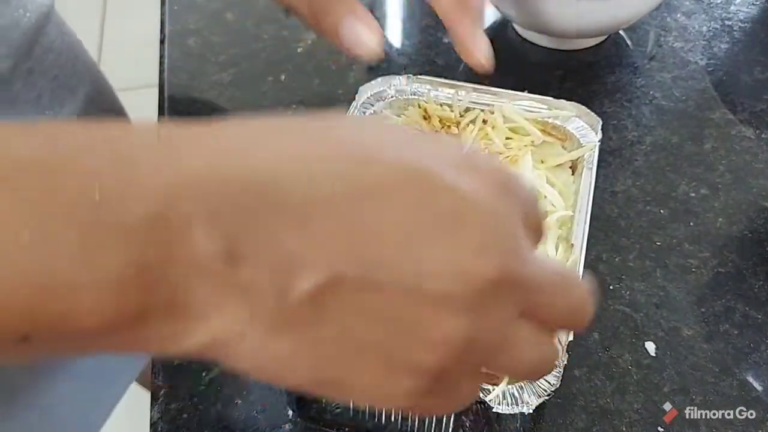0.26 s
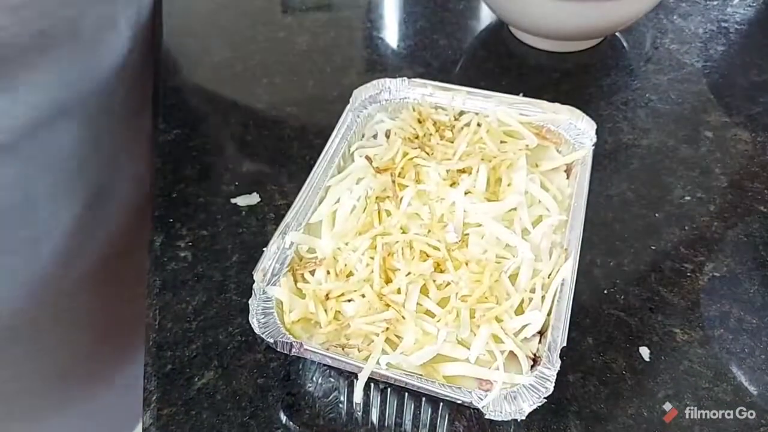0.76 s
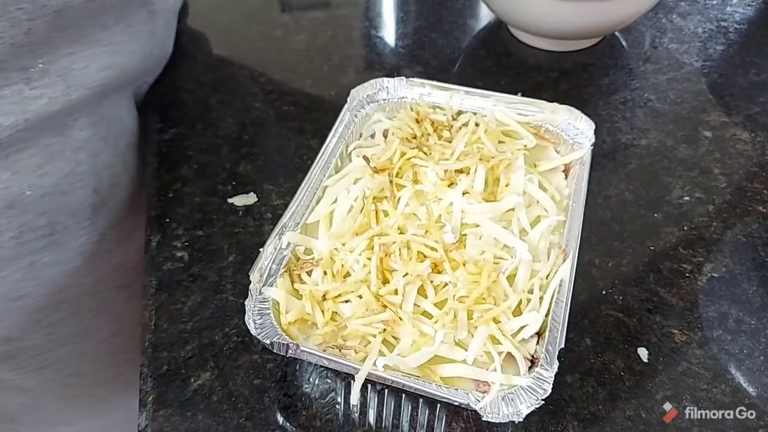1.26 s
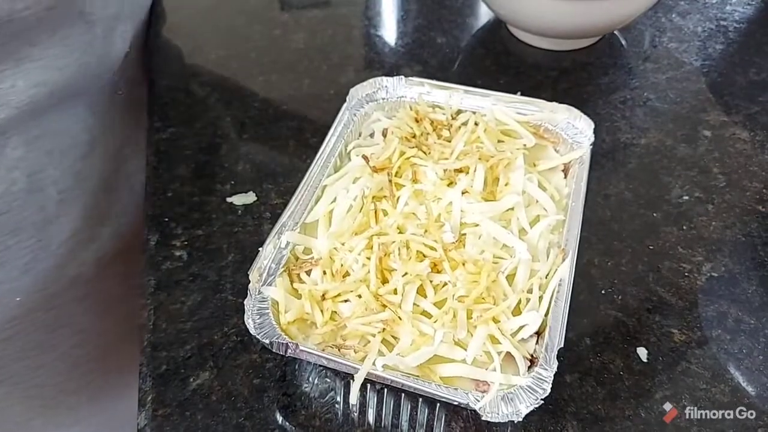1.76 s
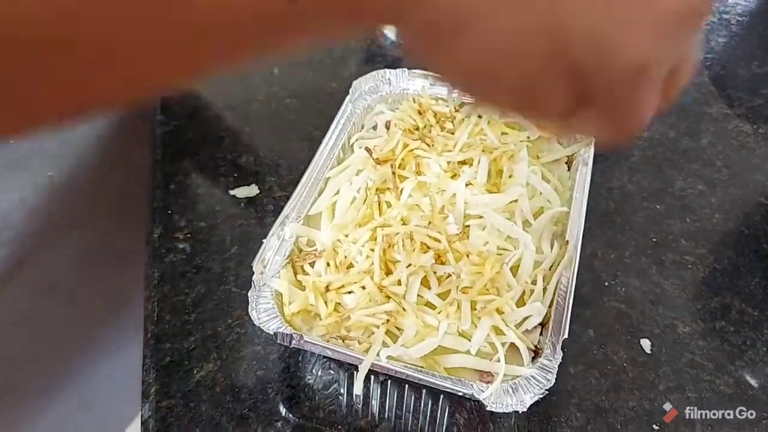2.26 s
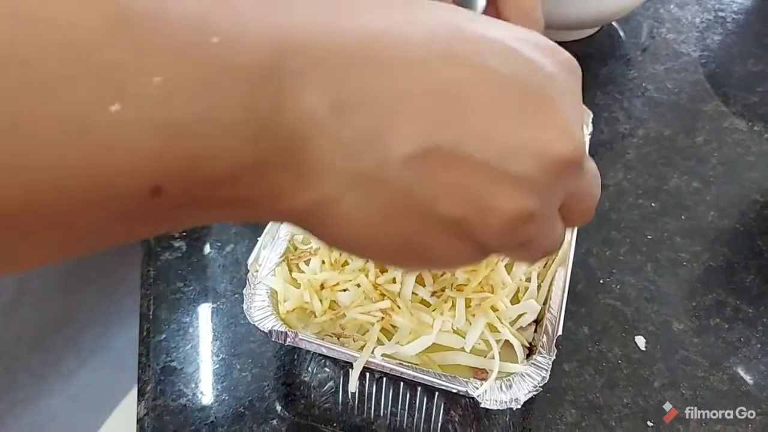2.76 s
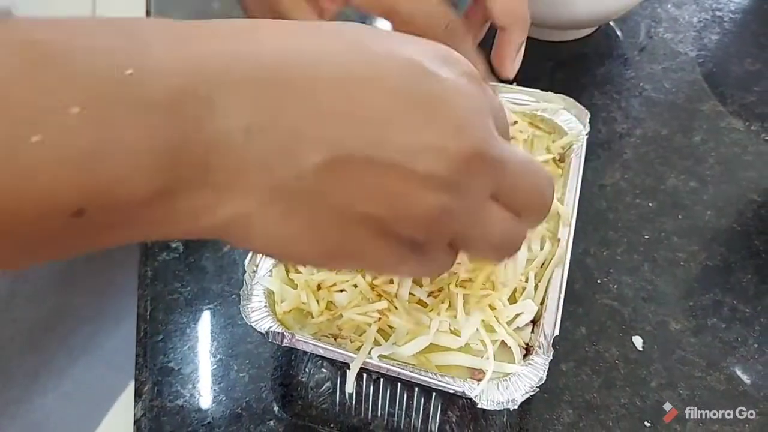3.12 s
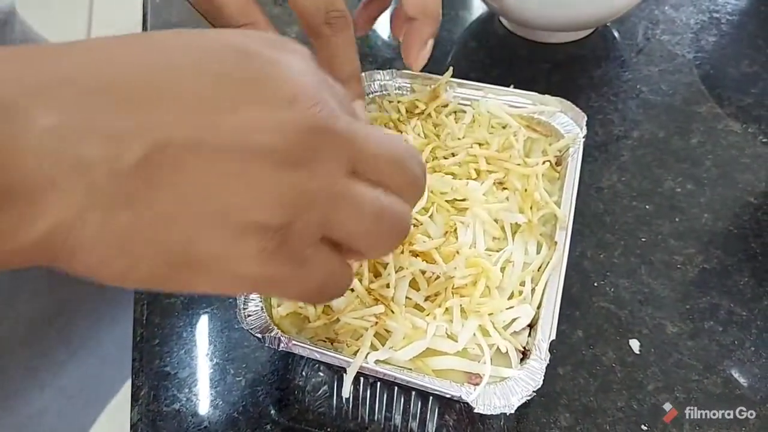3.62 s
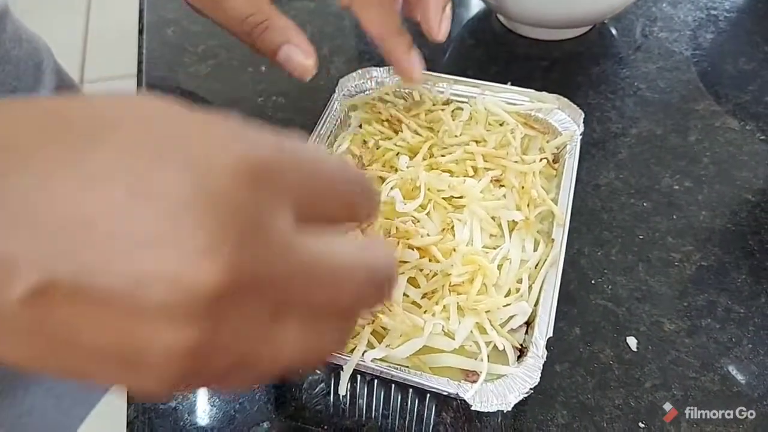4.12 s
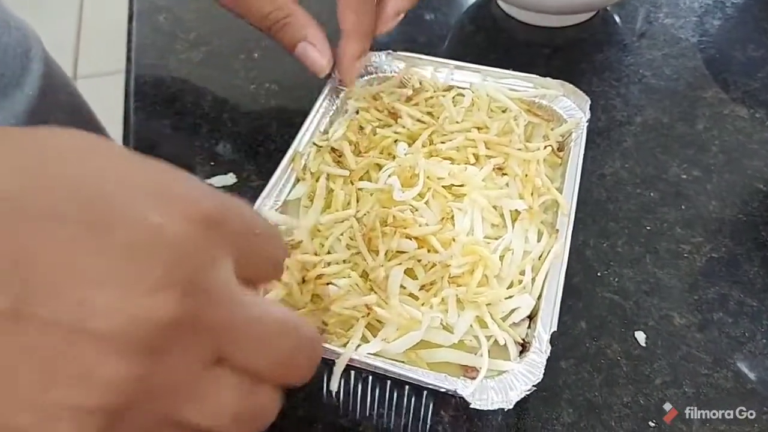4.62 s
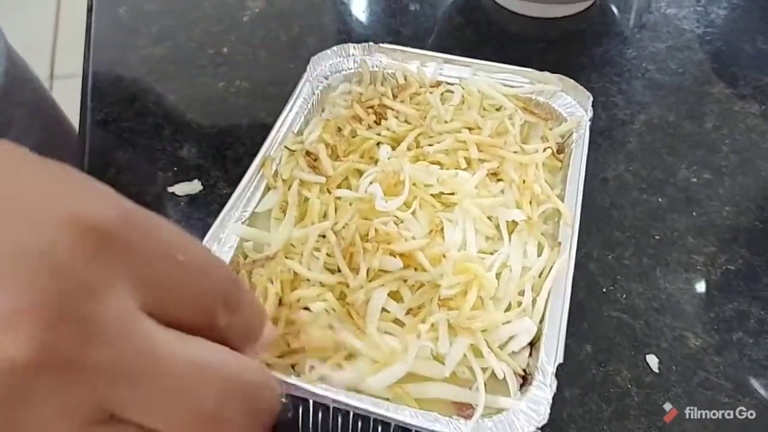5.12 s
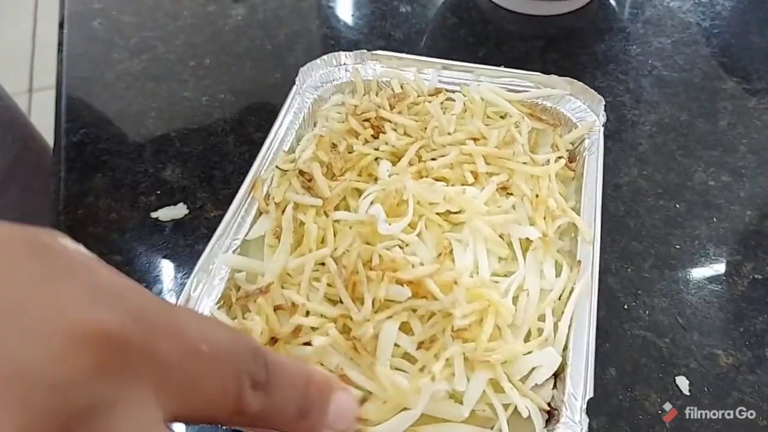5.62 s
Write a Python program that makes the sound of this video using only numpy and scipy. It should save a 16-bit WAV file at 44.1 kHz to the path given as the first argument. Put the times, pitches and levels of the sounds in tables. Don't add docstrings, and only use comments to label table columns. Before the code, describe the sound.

In a reverberant kitchen, fingers drop and press crunchy sticks onto a foil tray: a few snaps first, then a startling sheet-metal clang, a calm stretch, and several clusters of sharp ticks, crushes and light foil taps. Steady motor hum, broadband air and bassy street rumble lie underneath, dipping slightly after the clang. A far bird chirps hoarsely. Close stereo pickup.

```python
import sys
import numpy as np
from scipy import signal
from scipy.fft import rfft, irfft
from scipy.io import wavfile
from scipy.ndimage import uniform_filter1d

SR = 44100
rng = np.random.default_rng(int(sys.argv[2]) if len(sys.argv) > 2 else 0)


def int16_out(signal):
    q = np.round(np.clip(np.atleast_2d(signal).T, -1, 1) * 32767)
    wavfile.write(sys.argv[1], SR, q.astype(np.int16))


def natural_amplitude(level_db):
    exponent = np.asarray(level_db, float) / 20
    return 10 ** exponent


N = 259249
LID_S = 1.0955

# frequency in Hz, left-right likeness from 0 to 1.
COHERENCE = [(30, 0.73), (70, 0.11), (130, 1), (300, 0.92), (500, 0.68), (800, 0.26), (1400, 0),
             (3000, 0.019), (15000, 0)]


def evened(x):
    return x / np.sqrt(np.mean(x ** 2) + 1e-20)


def read(points, hz):
    f, value = np.transpose(points)
    return np.interp(np.log(hz + 1), np.log(f + 1), value)


def add(mix, s, sound):
    part = mix[..., round(s * SR):][..., :sound.shape[-1]]
    part += sound[..., :part.shape[-1]]


def resonate(x, hz, width):
    turn = np.exp(2j * np.pi * np.cumsum(hz * np.ones(x.shape[-1])) / SR)
    r = np.exp(-np.pi * width / SR)
    return 2 * (turn * signal.lfilter([1 - r], [1, -r], x / turn + 1e-18)).real


def steep(x, hz, width):
    return evened(resonate(resonate(x, hz, width), hz, width))


def colour(points):
    hz = abs(np.fft.fftfreq(4096, 1 / SR))
    log_gain = np.log(natural_amplitude(np.maximum(read(points, hz), -90)))
    return np.fft.ifft(np.exp(np.conj(signal.hilbert(log_gain)))).real[:2048]


def scattered(x):
    z = rfft(x)
    return irfft(z / (abs(z) + 1e-12), x.shape[-1])


def lumpy(x):
    return x / np.linalg.norm(x, axis=-1, keepdims=True)


def wander(hz):
    return evened(resonate(rng.standard_normal(N), 0, hz))


def diffuse(field_db, count):
    frames = count // 256 + 5
    hz = np.fft.rfftfreq(1024, 1 / SR)[:, None]
    a, b, c, d = rng.standard_normal((frames, 513, 4)).T
    same = np.clip(read(COHERENCE, hz), -1, 1)
    left = a + 1j * b
    right = same * left + np.sqrt(1 - same ** 2) * (c + 1j * d)
    z = np.array([left, right]) * natural_amplitude(field_db(hz, np.arange(frames) * 256 / SR))
    return signal.istft(z, nperseg=1024, noverlap=768)[1][:, :count]


def air():
    # frequency in Hz, density in dB per Hz.
    air_spectrum = [(20, -27), (35, -1), (60, -0.5), (85, -5), (130, -9.5), (300, -10), (600, -12.5),
                    (1200, -14.5), (2600, -17), (5500, -24.5), (7000, -31), (8000, -31), (12000, -39),
                    (16000, -51)]
    patches = rng.standard_normal((N // 256 + 5, 513)).T
    patches = evened(uniform_filter1d(uniform_filter1d(patches, size=14, axis=0), size=15, axis=1))
    s = np.arange(N) / SR
    lull_s, lull_width_s, lull_db = 1.96, 0.6, -4
    traffic_db = 1.5 * wander(0.79) + 0.4 * s
    traffic_db = traffic_db + lull_db * np.exp(-((s - lull_s) / lull_width_s) ** 2)
    traffic_db = traffic_db - traffic_db.mean()

    def field_db(hz, t):
        swell = np.interp(t, s, traffic_db) / (1 + (hz / 110) ** 4)
        return read(air_spectrum, hz) + 1.8 * patches + swell

    return natural_amplitude(-52.5) * evened(diffuse(field_db, N))


def hum():
    # frequency in Hz, level in dB.
    hum_lines = [(119.5, -63.5), (175.5, -49), (239.7, -56.5), (312, -73.5), (480, -64.5), (599, -69),
                 (657, -70), (720, -70.5), (2073, -73), (2164, -74.5), (2729, -72), (2810, -69)]
    # time in seconds, level in dB, frequency in Hz.
    pipe_glide = [
        (4.3, -60, 520),
        (4.36, -56.5, 463),
        (4.42, -53, 445.6),
        (4.5, -61, 469),
        (4.56, -59, 445),
        (4.619, -93, 440),
    ]
    t, out = np.arange(N) / SR, np.zeros((2, N))
    for hz, db in hum_lines:
        swim = np.clip(0.06 * natural_amplitude((-47 - db) * 0.7), 0, 1)
        apart = np.arccos(np.clip(read(COHERENCE, hz), -1, 1)) * np.array([[0], [1]])
        phase = 2 * np.pi * (hz * t + rng.random()) + 1.4 * swim * wander(1.8)
        out += np.sqrt(2) * natural_amplitude(db + 6.3 * swim * wander(1.3)) * np.sin(phase + apart)
    s, db, hz = np.transpose(pipe_glide)
    moan_db = np.interp(t, s, db, -120, -120) + 4.8 * wander(21.0)
    moan = np.sin(2 * np.pi * np.cumsum(np.interp(t, s, hz)) / SR) * natural_amplitude(moan_db)
    return out + moan


def bird():
    # start within the phrase in seconds, length in seconds, start pitch in Hz,
    # end pitch in Hz, level in dB.
    phrase = [
        (0, 0.066, 4760, 4740, -2.5),
        (0.023, 0.067, 5640, 5680, 1),
        (0.054, 0.057, 5520, 5280, -9),
        (0.078, 0.06, 3710, 3765, 2),
        (0.099, .055, 4340, 4250, 0),
        (.115, 0.065, 4680, 4700, -3),
        (.212, .036, 4000, 3670, -18),
    ]
    # start in seconds, level in dB, pitch factor.
    calls = [
        (2.257, -58, .995),
        (4.198, -56, 1.005),
    ]
    # start in seconds, length in seconds, start pitch in Hz, end pitch in Hz, level in dB.
    strays = [
        (0.576, 0.058, 5840, 5440, -69),
        (4.365, 0.11, 5870, 5900, -66),
        (5.562, 0.029, 5450, 5220, -63),
    ]
    out, shake = np.zeros(N), wander(124.0)
    sung = [(at + s, length, a * pitch, b * pitch, call_db + db)
            for at, call_db, pitch in calls for s, length, a, b, db in phrase]
    for s, length, start_hz, end_hz, db in sung + strays:
        t = np.arange(0, length, 1 / SR)
        hz = np.interp(t, [0, length], [start_hz, end_hz]) + 190 * shake[round(s * SR):][:len(t)]
        note = np.sin(2 * np.pi * np.cumsum(hz) / SR) * signal.windows.tukey(len(t), .6)
        add(out, s, natural_amplitude(db + 10.5) * note)
    return out


def room(x):
    # frequency in Hz, 60 dB decay in seconds.
    decay_times = [(120, 0.47), (330, 0.67), (870, 1), (1600, 0.72), (2300, 0.86), (6060, 0.74),
                   (12000, 0.54)]
    t = np.arange(SR) / SR
    z = rfft(diffuse(lambda hz, t: -60 * t / read(decay_times, hz), SR))
    power = uniform_filter1d(abs(z.mean(0)) ** 2 + .3 * abs(z[0]) ** 2, size=40)
    tail = irfft(z / np.sqrt(power), SR)
    tail = tail * np.clip(t / 0.00048, 0, 1) * (t < .9)
    return signal.fftconvolve(x[None], tail / np.linalg.norm(tail[0]), axes=1)[:, :N]


def lid():
    # frequency in Hz, level in dB, 60 dB decay in seconds.
    modes = [(232, -15.5, 0.62), (381.3, -3.5, 0.36), (427.7, -2.5, 0.31), (492, 3, 0.6),
             (721.5, -4.5, 0.47), (758, -12, 0.58), (810, -6.5, 0.31), (1002, -4, 0.23), (1210, -28, 0.32),
             (1236, -12.5, 0.51), (1603, -3, 0.16), (1636, 4, 0.082), (2065, -16, 0.29), (2364, -9, 0.48),
             (2397, 1, 0.37), (2433, -13, 0.39), (2487, -5.5, 0.45), (2573, -21, 0.35), (2980, -14, 0.2),
             (4030, -11.5, 0.47), (4250, -23, 0.13), (4900, -35, 0.15), (5500, -33, .3), (5460, -38, 0.25),
             (5860, -21.5, 0.61), (6300, -31, 0.27)]
    # frequency in Hz, density in dB per Hz.
    blow_spectrum = [(40, -20), (90, -17.5), (230, -21), (430, 0.5), (620, -9), (850, -5.5), (1300, -14),
                     (1650, -9), (2400, -9), (3200, -18.5), (5500, -19), (8000, -23), (12000, -34),
                     (16000, -47)]
    t = np.arange(SR) / SR
    ring = sum(natural_amplitude(db - 60 * t / t60) * np.sin(2 * np.pi * hz * t) for hz, db, t60 in modes)
    ring = ring * (1 - np.exp(-t / 0.002))
    blow = t[:600] * natural_amplitude(-60 * t[:600] / 0.0117)
    burst = scattered(rng.standard_normal(600) * blow) * np.sqrt(blow / blow.max())
    crack = np.convolve(burst, colour(blow_spectrum))
    out = np.zeros((2, N))
    add(out[0], LID_S, natural_amplitude(-8.5) * ring / abs(ring).max())
    add(out[1], LID_S, natural_amplitude(-6) * crack / abs(crack).max())
    return out


def rustle():
    # full strength from in seconds, hold in seconds, level in dB.
    stirs = [
        (0.0, .02, -69),
        (2.3, 0.22, -67.5),
        (3.375, 0.062, -60),
        (4.133, 0.22, -64),
        (4.6, .1, -76),
        (5.66, .25, -66.5),
    ]
    # frequency in Hz, density in dB per Hz.
    grain_spectrum = [(1500, -17), (3000, 5.5), (5000, 2), (8000, -2), (12000, -8), (16000, -14)]
    t = np.arange(N) / SR
    rise, fall = 69, 55
    level = sum(natural_amplitude(db - rise * np.maximum(s - t, 0) - fall * np.maximum(t - s - hold, 0))
                for s, hold, db in stirs)
    before = LID_S - t
    scrape = natural_amplitude(-53.5 - 52 * before)
    level = level + scrape * np.clip((0.16 - before) / 0.066, 0, 1) * (before > .006)
    grains = natural_amplitude(0.65 * np.minimum(rng.exponential(1, (N, 2)).T, 5)) * rng.standard_normal((N, 2)).T
    fizz = signal.oaconvolve(grains, colour(grain_spectrum)[None], axes=1)[:, :N]
    return natural_amplitude(2.0) * level * evened(fizz)


def brittle(shake, db, hz, foil_db, sizzle_db, top_hz):
    foil = steep(shake, 2260, 490) + 0.55 * steep(shake, 1686, 530) + 1.12 * steep(shake, 2800, 2200)
    rings = 0.77 * steep(shake, hz, 0.18 * hz) + 1.17 * steep(shake, hz * 0.96, 3180)
    sizzle = natural_amplitude(sizzle_db - 3.0) * steep(shake, 6000, 10600)
    sound = evened(rings) + natural_amplitude(foil_db) * evened(foil) + sizzle
    band = signal.butter(2, [900, min(top_hz, .45 * SR)], "band", fs=SR)
    sound = signal.lfilter(*band, sound)
    return natural_amplitude(db) * sound / abs(sound).max()


def break_shake():
    t = np.arange(3000) / SR
    noise = rng.standard_normal((2, 3000))
    blow = (1 - np.exp(-t / .0006)) * natural_amplitude(-60 * t / .009)
    burst = scattered((noise[0] + noise) * blow) + 0.89 * lumpy(noise * blow)
    return evened(burst * np.sqrt(blow)) + 1.7 * noise * natural_amplitude(-60 * t / 0.047)


def crush_shake(length):
    t = np.arange(3000) / SR
    noise, size = rng.standard_normal((2, 2, 3000))
    swarm = natural_amplitude(4.34 * evened(uniform_filter1d(size[0], size=30)))
    press = np.clip(t / (0.17 * length), 0, 1) * natural_amplitude(-60 * np.maximum(t - length, 0) / 0.049)
    return noise * swarm * press


def sticks():
    # start in seconds, peak in dB, ring in Hz, left-right balance in dB.
    snaps = [(0.1224, -45.5, 4570, -10), (0.1708, -35.5, 3680, -9), (0.2799, -30.5, 4360, -9),
             (2.6515, -32, 4240, 2), (3.3622, -33.5, 4200, -2), (3.449, -32.5, 5160, -2),
             (3.462, -29, 4900, -2), (3.5042, -30, 4360, -2), (3.5249, -43.5, 3040, 3),
             (3.6754, -27.5, 2800, 4), (3.68, -27, 7330, -5), (3.7017, -37, 3360, 3),
             (4.4632, -42, 7000, 6), (5.329, -48, 3900, -11)]
    # start in seconds, peak in dB, ring in Hz, left-right balance in dB.
    ticks = [(0.0944, -46, 3200, -8), (1.598, -49, 4050, 3), (2.6918, -24.5, 5500, -10.5),
             (2.9338, -45.5, 4900, -8), (3.0162, -44, 5860, -6), (3.356, -38, 6500, -7),
             (3.432, -46, 6000, 5), (3.4784, -41, 6500, 1), (3.558, -50, 7000, -2), (5.1183, -42, 7000, -9),
             (4.146, -42.5, 4530, 10), (4.158, -40, 4630, -1), (4.2222, -40, 7500, -2),
             (4.474, -36, 5000, -4.0), (4.5331, -34.5, 8900, -1.5), (4.7219, -32.5, 5040, -13),
             (5.1514, -40, 7000, 6), (5.1646, -27, 5500, -7.5), (5.6797, -48, 5700, 4),
             (5.7082, -35, 5900, -2.5), (5.7596, -44, 4530, 1.5)]
    # start in seconds, peak in dB, ring in Hz, left-right balance in dB.
    landings = [
        (0.1373, -44.5, 4220, -7),
        (3.667, -28, 4030, -11),
        (3.8532, -39, 5270, -3.5),
        (4.0954, -32.5, 4300, 9.5),
        (4.2474, -37, 4650, 2),
        (4.6989, -35.5, 6150, -21),
        (4.912, -54, 3500, 6),
        (5.7394, -42, 5350, -8),
    ]
    # start in seconds, peak in dB, ring in Hz, left-right balance in dB.
    knocks = [
        (3.2065, -34.5, 3160, -7),
        (3.4074, -41, 3430, 15),
        (3.6426, -37, 3380, 1),
    ]
    # start in seconds, peak in dB, ring in Hz, foil body in dB,
    # length in seconds.
    crushes = [(3.248, -52.5, 5840, -17, 0.049), (3.423, -44, 3500, 19, 0.046),
               (3.677, -32.5, 2770, -10, 0.0071), (3.682, -44.5, 2940, -11, 0.053),
               (4.083, -38.5, 4150, 1, 0.017), (4.085, -40, 960, -27, 0.014),
               (4.092, -40, 7400, -25, 0.017), (4.695, -39.5, 4540, 0, 0.014),
               (4.714, -36.5, 5700, -0.5, 0.021), (4.798, -37.5, 4450, 7, 0.0089),
               (5.173, -42, 5760, -16, 0.023), (5.704, -43, 5800, -21, 0.015)]
    # start in seconds, peak in dB, ring in Hz, foil body in dB,
    # length in seconds.
    crumbles = [
        (2.697, -54, 5400, 4, 0.034),
        (3.352, -38, 5260, 7, 0.03),
        (3.375, -45, 5000, -1.5, 0.021),
        (5.155, -39, 12100, -21, .016),
        (5.736, -37, 4960, -28, 0.0067),
    ]
    # foil body in dB, sizzle in dB, top in Hz
    single_kinds = [(snaps, (-10.5, -19, 12700)), (ticks, (-45, 1.6, 16000)),
                    (landings, (-1.5, -20, 10700)), (knocks, (23, -19, 4600))]
    # sizzle in dB, top in Hz
    swarm_kinds = [(crushes, (-13, 16000)), (crumbles, (5.8, 12000))]
    out = np.zeros((2, N))
    for rows, tone in single_kinds:
        for s, db, hz, pan_db in rows:
            pan = natural_amplitude([[(pan_db + 9.0) / 2], [-(pan_db + 3.5) / 2]])
            add(out, s, brittle(break_shake(), db + 2.0, hz, *tone) * pan)
    for rows, tone in swarm_kinds:
        for s, db, hz, foil_db, length in rows:
            add(out, s, brittle(crush_shake(length), db + 7.5, hz, foil_db, *tone))
    return out


def scene():
    near, (ring, crack) = sticks(), lid()
    echoes = room(natural_amplitude(-8.5) * near.mean(0) + natural_amplitude(-4.5) * ring + natural_amplitude(7.0) * crack + bird())
    return near + ring + crack + echoes + rustle() + hum() + air()


def roll_off(x):
    return signal.sosfilt(signal.butter(12, 16490, fs=SR, output="sos"), x)


def record(dry):
    # frequency in Hz, left-right balance in dB.
    port_balance = [(60, -10.5), (110, -1.5), (200, -0.5), (380, 1.5), (700, -2.5), (1290, -1), (2380, -3),
                    (4400, -8.5), (8120, 3.5), (15000, 4.5)]
    hz = np.fft.rfftfreq(N, 1 / SR)
    lean = read(port_balance, hz) / 2
    band = (hz < 16300) / (1 + (45 / (hz + 1)) ** 6)
    ported = irfft(rfft(dry) * natural_amplitude([lean, -lean]) * band, N)
    duck_db, lag_s, fall_s, hold_s, back_s = -3.5, 0.27, 0.5, 0.41, 0.4
    turns_s = LID_S + np.cumsum([lag_s, fall_s, hold_s, back_s])
    gain_db = np.interp(np.arange(N) / SR, turns_s, [0, duck_db, duck_db, 0])
    return roll_off(ported * natural_amplitude(gain_db))


dry = scene()
out = record(dry)
int16_out(out)
```